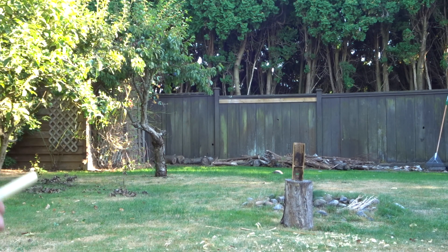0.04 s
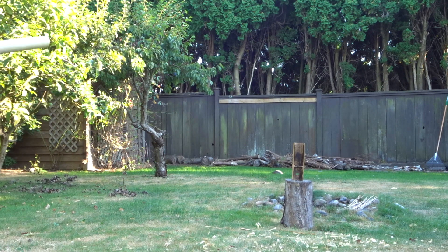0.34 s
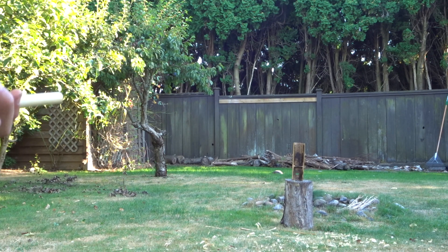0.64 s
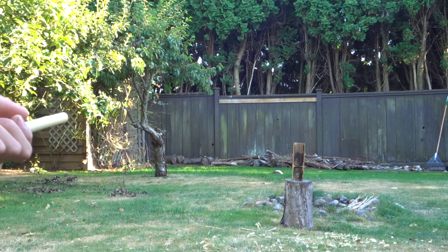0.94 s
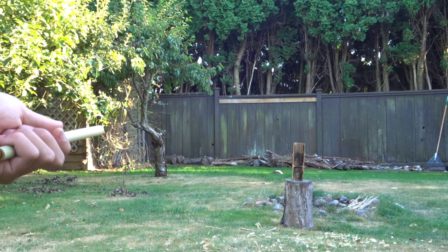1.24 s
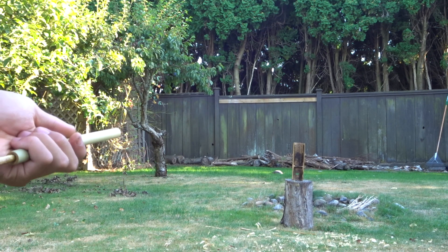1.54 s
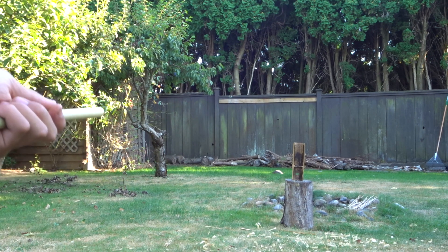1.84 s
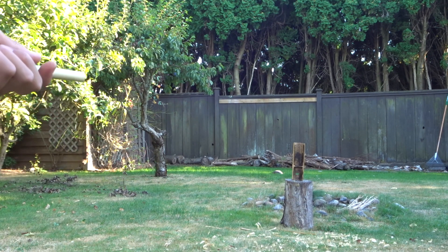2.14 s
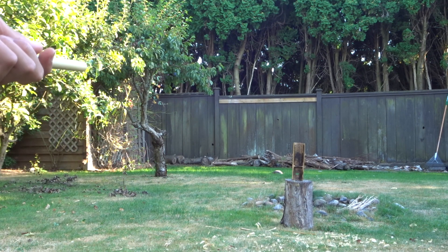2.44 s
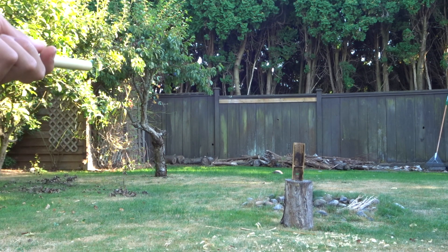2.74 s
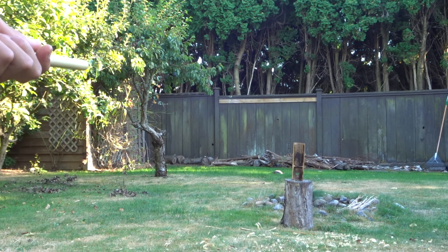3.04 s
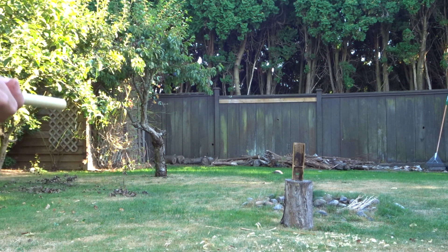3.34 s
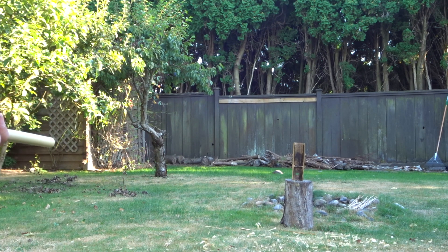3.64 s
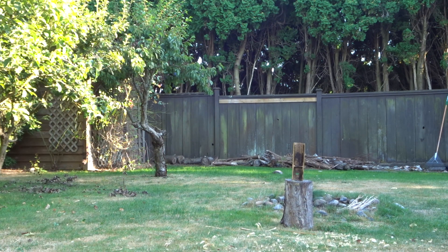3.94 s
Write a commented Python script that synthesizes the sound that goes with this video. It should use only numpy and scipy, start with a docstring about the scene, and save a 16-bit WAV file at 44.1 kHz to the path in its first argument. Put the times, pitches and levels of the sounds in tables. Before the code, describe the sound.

A bamboo pop gun fires one sharp pop outdoors after faint scraping and ticking.

```python
"""In a fenced garden, a bamboo pop gun is fired once, close to the microphone.
Friction makes the rod scrape in the tube, and light impacts excite the modes of the bamboo. The rod is
rammed home and the pellet pops out: the shortening air column chirps and a puff of air thumps.
The fence and trunks reflect the pop and the hedges scatter it, over the low rumble of a distant town."""
import sys
import numpy as np
from scipy import signal
from scipy.fft import rfft, irfft
from scipy.io import wavfile
from scipy.ndimage import uniform_filter1d

SR = 44100
rng = np.random.default_rng(int(sys.argv[2]) if len(sys.argv) > 2 else 0)


def persist_wave(psi):
    """Save psi, clipped to +-1, as 16-bit WAV."""
    counts = np.round(np.clip(psi, -1, 1) * 32767).astype(np.int16)
    wavfile.write(sys.argv[1], SR, np.atleast_2d(counts).T)


N = 176400

# likeness of the sound at the two microphones (frequency [Hz], correlation [-1 to 1])
STEREO_CORRELATION = [(30, .997), (125, 1), (250, 0.96), (500, 0.7), (1000, 0.71), (2400, 0.69),
                      (3700, 0.35), (4800, -0.11), (8000, -0.19), (11000, -0.2)]
# spectrum of distant traffic (frequency [Hz], relative level [dB])
TRAFFIC_SPECTRUM = [(15, -43), (25, -17.5), (48, -7), (64, 0), (92, -8.5), (112, -4), (156, -6.5),
                    (178, -13), (192, -9), (223, -9), (247, -7), (327, -14.5), (381, -6.5), (422, -14),
                    (492, -11.5), (545, -15.5), (668, -12), (819, -11.5), (1430, -22.5), (2050, -23.5),
                    (4180, -42), (4990, -39.5), (11000, -50.5), (14300, -86), (22000, -120)]
# slow rise in the level of the background rumble (time [s], relative level [dB])
BACKGROUND_LEVEL = [(0, -59.5), (.5, -57), (1.2, -55.5), (2.4, -54.5), (3.1, -54.5), (3.65, -52),
                    (3.85, -56.5)]
# hum of distant machines (frequency [Hz], level [dB])
MACHINE_HUM = [(63, -67.5), (118, -66), (153, -65.5), (203, -73), (255, -72)]
# bands of foliage scatter (frequency [Hz], relative spectral density [dB], hold [s], T60 [s])
FOLIAGE_BANDS = [(480, -24.5, 0.044, 0.4), (730, -11, 0.087, 0.52), (1200, -9.5, .1, .46),
                 (1900, -0.5, 0.092, 0.39), (2700, 0.5, .1, 0.41), (4000, -3, 0.079, 0.32),
                 (5400, -9, 0.073, 0.31), (6800, -13.5, 0.05, 0.32), (8300, -23, 0.041, 0.35),
                 (10000, -13.5, 0.051, .22)]
# echoes from fence and trunks (time [s], level [dB], scatter decay [s], left minus right [dB])
REFLECTIONS = [(3.2478, -18, .001, 1), (3.276, -17.5, 0.0033, -1), (3.2895, -21, 0.0026, -5),
               (3.2995, -9.5, 0.00036, -2), (3.3028, -14, .0004, -3.5), (3.3052, -31, .001, -2),
               (3.316, -18.5, .003, 0), (3.3357, -23, .001, -2), (3.364, -29, .002, -2),
               (3.4074, -27, 0.0054, -2), (3.433, -37, 0.0022, -2)]
# spectrum of each echo (frequency [Hz], relative level [dB])
ECHO_SPECTRUM = [(400, -31), (800, -12), (1500, -2.5), (2500, 7), (4500, -1), (6500, -23), (10500, -36)]
# slow slide of the rod (time [s], level [dB])
SLIDE_LEVEL = [(0, -64), (.05, -63.5), (.11, -67), (.19, -63), (.28, -58), (.5, -61.5), (.7, -59),
               (.81, -57), (.89, -64), (1.03, -67), (1.1, -57.5), (1.15, -57.5), (1.23, -70), (1.45, -75)]
# spectrum of the rod's contact with the tube (frequency [Hz], relative level [dB])
CONTACT_SPECTRUM = [(900, -34.5), (1800, -8.5), (2400, 1), (3000, -8), (3400, -12), (3680, -5.5),
                    (3950, -9.5), (4300, -11.5), (4700, -5.5), (5600, -13), (8000, -15.5), (9800, -12),
                    (11000, -13.5)]
# quick strokes of the rod (time of full speed [s], rise [s], hold [s], release [s], level [dB])
ROD_STROKES = [(3.191, 0.053, 0.014, 0.085, -38.5), (3.247, 0.026, .03, 0.11, -42),
               (4.0, 0.067, .02, .1, -43.5)]
# spectrum of the strokes (frequency [Hz], relative level [dB])
STROKE_SPECTRUM = [(300, -7), (600, -4.5), (1100, -10.5), (1600, -12.5), (2100, -6), (2500, -0.5),
                   (3300, -6.5), (4200, -3.5), (5500, -11), (6600, -10.5), (8500, -14.5), (9700, -12),
                   (11000, -19)]
# taps of the rod (time [s], level [dB], centre of excitation [Hz], T60 factor set by the grip [ratio])
ROD_TAPS = [(0.1974, -42.5, 3700, 1.1), (.207, -50, 3100, 1), (0.2172, -52, 2700, .9),
            (0.2278, -49, 2900, 1.3), (.237, -45, 3100, 1.2), (.4336, -45, 3100, 0.65),
            (0.5427, -51, 3100, .6), (.689, -50, 2900, .6), (.7803, -46, 3520, .6),
            (1.4032, -50, 4000, .35)]
# modes of the bamboo tube (frequency [Hz], relative level [dB], T60 [s])
BAMBOO_MODES = [(2230, -3, .035), (2700, 0.5, 0.039), (3050, -5.5, .03), (3360, -2, 0.031),
                (3700, -8, .025), (4470, -5, .035), (4740, -0.5, 0.027), (6050, -8, .02)]
# snaps of rod and pellet (time [s], level [dB], decay [s], resonance [Hz])
SNAPS = [(3.2181, -22, .0015, 3700), (3.2206, -20, .0006, 2800), (3.2258, -19.5, .0015, 3200),
         (3.2283, -24, .0018, 4500), (3.2354, -23, .0007, 3900)]
# spectrum of the noise in a snap (frequency [Hz], relative level [dB])
SNAP_SPECTRUM = [(200, -15), (700, -3), (1300, -9), (3000, -2), (5000, -3.5), (8000, -8), (10500, -4)]

POP_S = 3.2257
# lobes of the puff of air (time [s], Gaussian width [s], level [dB])
SUCTION, PRESSURE, BACKFLOW = (3.2267, .00059, -21.5), (3.2298, .0018, -26), (3.253, .011, -44)


def undb(db):
    """Amplitude ratio of a level in decibels."""
    return 10 ** (np.asarray(db) / 20)


def unit(x):
    """Normalisation to rms 1."""
    return x / np.sqrt(np.mean(x ** 2))


def clock():
    """Time of each sample in seconds."""
    return np.arange(N) / SR


def on_bins(points):
    """Interpolation of (frequency, value) points onto the spectral bins, in log frequency."""
    hz, values = np.array(points).T
    bins = np.maximum(np.fft.rfftfreq(N, 1 / SR), 1e-3)
    return np.interp(np.log(bins), np.log(hz), values)


def colour(x, spectrum):
    """Minimum-phase filtering: folding the cepstrum makes the response causal."""
    cepstrum = irfft(np.log(undb(on_bins(spectrum))), N)
    cepstrum[1:N // 2] *= 2
    cepstrum[N // 2 + 1:] = 0
    return irfft(rfft(x) * np.exp(rfft(cepstrum)), N)


def resonate(x, hz, width_hz):
    """Second-order resonance with gain 1 at its centre."""
    return signal.lfilter(*signal.iirpeak(hz, hz / width_hz, fs=SR), x)


def pan(db):
    """Direction by level difference: gains for left minus right in decibels."""
    return undb(np.array([[db], [-db]]) / 2)


def wander(rate_hz):
    """Smoothed random fluctuation of rms 1."""
    span = max(int(SR / rate_hz), 1)
    steps = np.repeat(rng.standard_normal(N // span + 1), span)
    return unit(uniform_filter1d(uniform_filter1d(steps, span), span)[:N])


def stereo_noise(grain_db=0):
    """Partial coherence: white noise, alike on both sides in the bass; uneven samples add grain."""
    mid, side = rfft(unit(rng.standard_normal((2, N)) * undb(grain_db * rng.standard_normal(N))))
    correlation = np.clip(on_bins(STEREO_CORRELATION), -.999, .999)
    side = side * np.sqrt((1 - correlation) / 2) * np.array([[1], [-1]])
    return irfft(mid * np.sqrt((1 + correlation) / 2) + side, N)


def fade(start, decay_s):
    """Exponential decay after a sudden onset."""
    age = clock() - start
    return (age >= 0) * np.exp(-np.clip(age / decay_s, 0, 60))


def damping(age, t60):
    """Exponential damping by 60 dB in t60 seconds."""
    return np.exp(-np.log(1000) * age / t60)


def town():
    """Superposition of distant sources: broadband traffic rumble and narrowband machine hum."""
    t = clock()
    rumble = unit(colour(stereo_noise(), TRAFFIC_SPECTRUM)) * undb(-.53 + .54 * wander(12))
    level = undb(np.interp(t, *np.array(BACKGROUND_LEVEL).T))
    hum = sum(undb(db) * unit(resonate(rng.standard_normal(N), hz, width_hz=6.3))
              for hz, db in MACHINE_HUM)
    return (rumble * level + hum * np.minimum(.52 + t / 1.5, 1)) * pan(-.4)


def foliage():
    """Diffuse scattering: countless small echoes of the pop build up, hold and die, the treble first."""
    rise_s, level_db = .026, -27.5
    age = np.maximum(clock() - POP_S, 0)
    shape = [(100, -49)] + [band[:2] for band in FOLIAGE_BANDS] + [(13000, -43)]
    spectrum = rfft(unit(colour(stereo_noise(grain_db=4), shape)))
    scatter = 0
    for hz, _, hold, t60 in FOLIAGE_BANDS:
        share = on_bins([(band[0], float(band[0] == hz)) for band in FOLIAGE_BANDS])
        late = np.maximum(age - hold, 0)
        far = undb(-33) * damping(late, t60=1.2)  # weak return from the neighbourhood
        scatter += irfft(spectrum * share, N) * np.hypot(damping(late, t60), far)
    onset = np.minimum(age / rise_s, 1) ** 2
    return scatter * onset * undb(level_db + 1.4 * wander(300)) * pan(-2)


def echoes():
    """Specular reflection: fence and trunks return the pop as impulses, each trailed by scatter."""
    returns, noise = np.zeros((2, N)), stereo_noise()
    for start, db, decay_s, pan_db in REFLECTIONS:
        scatter = undb(-9) * noise * fade(start, decay_s) / 2
        returns += undb(db) * pan(pan_db) * (signal.unit_impulse(N, int(start * SR)) + scatter)
    impulse_peak = np.abs(colour(signal.unit_impulse(N), ECHO_SPECTRUM)).max()
    return colour(returns, ECHO_SPECTRUM) / impulse_peak


def rod_friction():
    """Sliding friction: the rod rubs unevenly in the tube, first slowly, then in quick strokes."""
    t = clock()
    stroke_range_db, grip_db = 27.5, 1.5
    slide = unit(colour(stereo_noise(grain_db=5), CONTACT_SPECTRUM))
    slide *= undb(np.interp(t, *np.array(SLIDE_LEVEL).T) + .68 * wander(60.26))
    effort = 0
    for full_s, rise, hold, release, db in ROD_STROKES:
        slowing = np.maximum(full_s - t, 0) / rise + np.maximum(t - full_s - hold, 0) / release
        effort += undb(db - stroke_range_db * slowing)
    strokes = unit(colour(stereo_noise(grain_db=6), STROKE_SPECTRUM))
    strokes *= effort * undb(grip_db * wander(200))
    highpass = signal.butter(2, 300, "high", fs=SR, output="sos")
    return slide * pan(.5) + signal.sosfilt(highpass, strokes) * pan(-.5)


def rod_ticks():
    """Modal vibration: each tap gives a burst of contact noise and its own mix of bamboo modes."""
    t, ticks = clock(), np.zeros((2, N))
    focus_octaves = .57
    contact = unit(colour(stereo_noise(), CONTACT_SPECTRUM))
    for start, db, centre_hz, t60_factor in ROD_TAPS:
        ringing = (t >= start) & (t < start + .1)
        age, ring = t[ringing] - start, 0
        for hz, mode_db, t60 in BAMBOO_MODES:
            size, detune, lag = rng.standard_normal(3)
            excitation = np.exp(-.5 * (np.log2(hz / centre_hz) / focus_octaves) ** 2)
            envelope = undb(mode_db + 1.7 * size) * excitation * damping(age, t60 * t60_factor)
            phase = 2 * np.pi * (hz * (1 + .008 * detune) * age + rng.random())
            stereo_shift = .5 * lag * np.array([[1], [-1]])
            ring += envelope * np.sin(phase + stereo_shift) / 2
        ticks[:, ringing] += undb(db) * ring
        ticks += undb(db - 17) * contact * fade(start, decay_s=.003)
    return ticks


def hand_knock():
    """Impact excitation: the hand hits the end of the tube and starts a damped oscillation."""
    start, hz = 3.2208, 620
    return undb(-17.5) * fade(start, decay_s=.00095) * np.sin(2 * np.pi * hz * (clock() - start))


def snaps():
    """Broadband transients: rod and pellet crack, each snap coloured by one main resonance."""
    noise, cracks = unit(colour(stereo_noise(), SNAP_SPECTRUM)), 0
    for start, db, decay_s, hz in SNAPS:
        ring = undb(13) * resonate(noise, hz, width_hz=900)
        cracks += undb(db) * fade(start, decay_s) * unit(noise + ring)
    return cracks


def air_puff():
    """Pulse radiation: air at the muzzle thumps in lobes of suction, pressure and slow backflow."""
    def lobe(centre_s, width_s, db):
        return undb(db) * np.exp(-.5 * ((clock() - centre_s) / width_s) ** 2)
    return lobe(*PRESSURE) - lobe(*SUCTION) - lobe(*BACKFLOW)


def air_chirp():
    """Air-column resonance: the pitch rises as the rod shortens the column."""
    start_hz, end_hz, glide_s, ring_s = 2240, 3950, .0015, .0036
    age = np.maximum(clock() - POP_S, 0)
    hz = end_hz + (start_hz - end_hz) * np.exp(-age / glide_s)
    phase = 2 * np.pi * np.cumsum(hz * (age > 0)) / SR
    envelope = undb(-15.5) * np.exp(-(age / ring_s) ** 2)
    return envelope * (np.sin(phase) + undb(-16) * np.sin(2 * phase))


def scene():
    """Linear superposition: the pressures from gun, garden and town add."""
    gun = rod_friction() + rod_ticks() + hand_knock() + snaps() + air_puff() + air_chirp()
    return gun + echoes() + foliage() + town()


def record(dry):
    """Dynamic compression: gain control ducks a little after the pop; a steep low-pass cuts the top."""
    knee_db, slope, memory_s, cutoff_hz = -34.5, .17, .052, 10950
    pole = np.exp(-1 / (memory_s * SR))
    power = signal.lfilter([1 - pole], [1, -pole], np.mean(dry ** 2, axis=0))
    ducked = dry * (1 + power / undb(knee_db) ** 2) ** -slope
    return signal.sosfilt(signal.ellip(12, .1, 80, cutoff_hz, fs=SR, output="sos"), ducked)


dry = scene()
out = record(dry)
persist_wave(out)
```